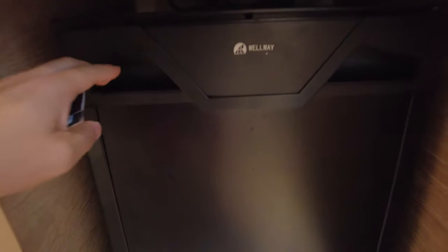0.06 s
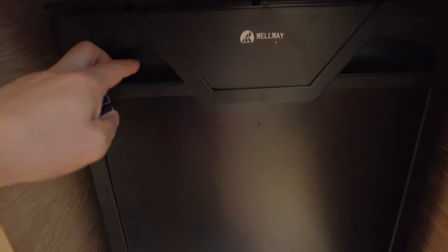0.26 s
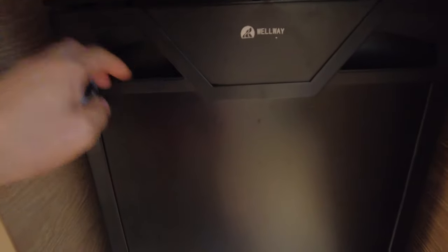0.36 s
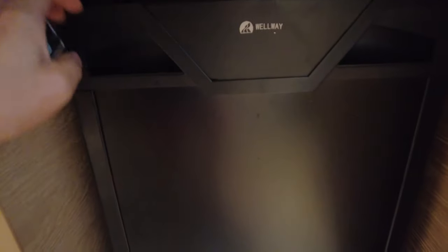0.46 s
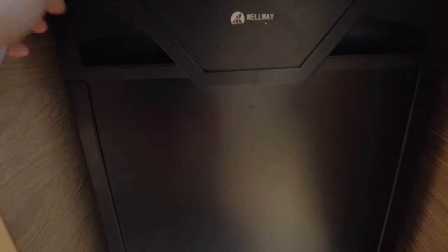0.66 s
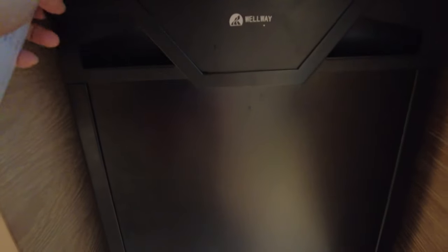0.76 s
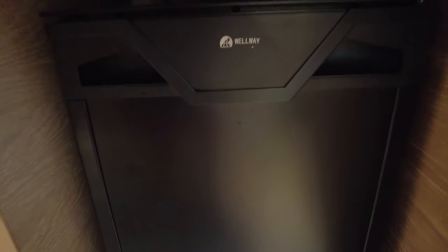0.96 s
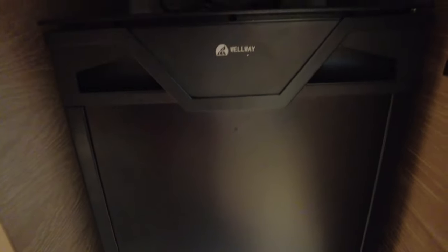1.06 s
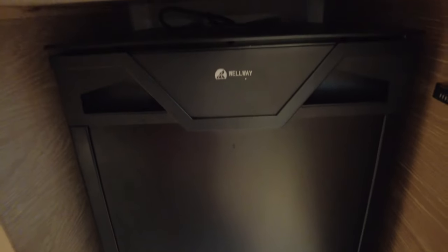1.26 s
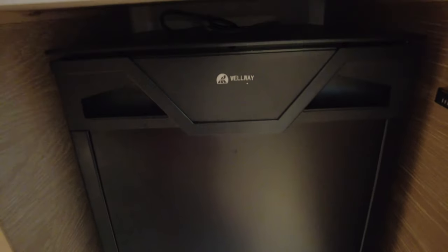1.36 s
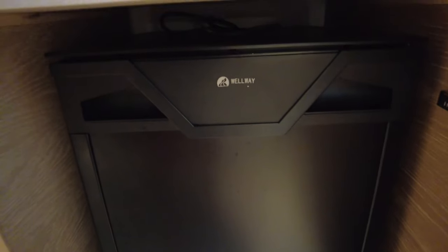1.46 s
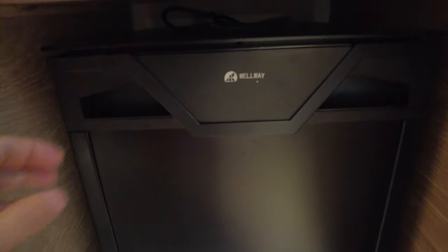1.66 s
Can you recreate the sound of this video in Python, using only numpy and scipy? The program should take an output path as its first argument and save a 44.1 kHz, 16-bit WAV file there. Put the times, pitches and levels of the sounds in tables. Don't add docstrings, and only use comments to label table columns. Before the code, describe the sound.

Sharp plastic clicks and a low knock as a small fridge door grip is handled up close

```python
import sys
import numpy as np
from scipy import signal
from scipy.io import wavfile
from scipy.ndimage import uniform_filter1d, map_coordinates

SR = 44100
rng = np.random.default_rng(int(sys.argv[2]) if len(sys.argv) > 2 else 0)


def decibels_to_gain(level_db):
    exponent = np.asarray(level_db, float) / 20
    return 10 ** exponent


def unload_wav(signal):
    wavfile.write(
        sys.argv[1],
        SR,
        np.round(np.clip(np.atleast_2d(signal).T, -1, 1) * 32767).astype(np.int16),
    )


N = 74970
T = np.arange(N) / SR
OPPOSITE = np.array([[1], [-1]])

# f/Hz, level/dB, t60/s
GRIP_MODES = [(1250, -9, .018), (1615, -4, .02), (2170, -7, .014), (2620, -4, .015), (3400, -7, .012),
              (3900, -8, .012), (4680, -9, .01), (5500, -11, .01), (7400, -13, .008), (8700, -15, .008)]
# f/Hz, level/dB, t60/s
PANEL_MODES = [(194.4, -5.5, 0.23), (236.8, -5.5, 0.14), (295.2, -7, 0.15), (354, -14, 0.12),
               (409.4, -4.5, 0.065), (466, -9, 0.11), (584, -9.5, 0.044), (711, -15.5, 0.012),
               (990, -24, 0.039)]


def unit(x):
    return x / np.sqrt(np.mean(x ** 2))


def even(x, fade):
    return x * np.sqrt(np.sum(fade ** 2) / np.sum(x ** 2, axis=1, keepdims=True))


def band(x, hz, width):
    return signal.lfilter(*signal.iirpeak(min(hz, .45 * SR), max(hz / width, .2), fs=SR), x)


def ring(x, hz, t60):
    pole = np.exp(2j * np.pi * hz / SR - np.log(1000) / (t60 * SR))
    return signal.lfilter([1], [1, -pole], x).imag


def highpass(x, hz):
    return signal.lfilter(*signal.butter(2, hz, "high", fs=SR), x)


def walk(rate):
    hold = int(SR / rate)
    steps = np.repeat(rng.standard_normal(N // hold + 1), hold)
    return 1.3 * uniform_filter1d(uniform_filter1d(steps, hold), hold)[:N]


def add(out, s, x):
    i = int(s * SR)
    out[..., i:i + x.shape[-1]] += x[..., :N - i]


def wide_burst(fade):
    mid, side = rng.standard_normal((2, len(fade)))
    side_db = -2.5
    return even((mid + decibels_to_gain(side_db) * side * OPPOSITE) * fade, fade)


def grip_ring(push, level_db):
    body = 0
    for hz, db, t60 in GRIP_MODES:
        level_luck, pitch_luck = rng.standard_normal(2)
        level = decibels_to_gain(db + level_db + 0.85 * level_luck)
        body = body + level * ring(push, hz * (1 + 0.058 * pitch_luck), t60)
    return body


def clicks():
    # t/s, level/dB, own ring f/Hz, crack/dB re level, grip/dB re level
    click_events = [(0.212, -32, 2460, -25, 0.5), (0.2131, -29.5, 4010, -18, -0.5),
                    (0.2165, -39.5, 2480, -25, -12), (0.2298, -29.5, 1260, -25, -2.5),
                    (0.2305, -42, 4030, -15, -15), (0.2365, -32.5, 2420, -23, -6),
                    (0.2425, -47, 2450, -25, -10), (0.2478, -41, 2180, -25, -21),
                    (0.2545, -38, 1600, -25, -19), (0.3689, -39, 2410, -25, -18),
                    (0.3774, -41, 2840, -12, -7.5), (.3935, -35, 1580, -25, -23),
                    (0.4275, -35.5, 2680, -15, -15), (.5260, -45.5, 1460, -32, -10),
                    (.5325, -36.5, 663, -31, -20), (.5345, -53, 2200, -27, -10),
                    (0.5475, -53.5, 3100, -20, 2.5), (0.586, -28.5, 1630, -38, -23.5),
                    (0.5885, -47.5, 1600, -24, -7), (.594, -48, 2550, -21, -7), (0.598, -36, 974, -27, -17),
                    (.6035, -49, 1430, -25, -15), (.6420, -59, 7700, 9.5, -2), (0.736, -50, 1420, -27, -21),
                    (0.7572, -40.5, 1690, -21, -16), (.8650, -46.5, 1580, -30, -24),
                    (0.8765, -46.5, 5050, -19, -7), (0.8995, -46.5, 1490, -20, -14),
                    (1.3111, -33, 1625, 8, -8), (1.3118, -35, 2440, -6, -4.5), (1.316, -49, 2200, 2, 1),
                    (1.3605, -58, 2290, 13, 9)]
    scrape_s, snap_s, crack_s = 0.0015, 0.0041, 0.00039
    snap_hz, crack_hz = 3800, 12700
    grip_level_db, snap_db = -1.5, 3.5
    out, t = np.zeros((2, N)), T[:6000]
    for s, db, hz, crack_db, grip_db in click_events:
        scrape = rng.standard_normal(len(t)) * np.exp(-t / scrape_s)
        scrape = scrape / np.sqrt(np.sum(scrape ** 2))
        own_t60 = .018 * (1660 / hz) ** .4
        own_ring = ring(scrape, hz, own_t60)
        body = grip_ring(scrape, grip_level_db + grip_db)
        crack = band(wide_burst(np.exp(-t / crack_s)), crack_hz, 18000.0)
        crack = highpass(1.1 * decibels_to_gain(crack_db) * crack, 3000)
        snap = band(wide_burst(np.exp(-t / snap_s)), snap_hz, 6000.0)
        snap = decibels_to_gain(snap_db + grip_db) * band(snap, snap_hz, 6000.0)
        add(out, s, decibels_to_gain(db) * (snap + own_ring + body + crack))
    return highpass(out, 520)


def panel_ring(tap):
    side_db = -12.5
    panel = 0
    for hz, db, t60 in PANEL_MODES:
        level_luck, side_luck = rng.standard_normal(2)
        balance = 1 + decibels_to_gain(side_db) * side_luck * OPPOSITE
        panel = panel + decibels_to_gain(db + 3.52 * level_luck) * balance * ring(tap, hz, t60)
    return panel


def knocks():
    # t/s, cabinet level/dB, cabinet f/Hz, panel level/dB, direction +-1
    knock_events = [(.003, -38, 49, -43, 1), (0.2116, -61, 121, -28, -1), (0.2137, -18, 79.3, -37.5, 1),
                    (0.2228, -62, 75, -30.5, -1), (0.263, -33, 62, -35, 1), (0.281, -32, 66, -39.5, 1),
                    (.335, -39, 94, -41, 1), (0.371, -36.5, 49.4, -41.5, -1), (.392, -29, 87.6, -35.5, 1),
                    (0.4, -60, 129, -39, -1), (.411, -45, 118, -37, -1), (.419, -49, 92.5, -32.5, -1),
                    (0.449, -64, 124, -41.5, -1), (.599, -62, 129, -37.5, 1), (0.606, -67, 129, -38.5, 1),
                    (0.635, -59, 68.5, -45, 1), (0.703, -36, 60.5, -50, -1), (0.764, -43, 93, -42, 1),
                    (0.815, -38.5, 149, -62, 1), (0.869, -38.5, 45, -44.5, 1), (.897, -31.5, 119.4, -38, 1),
                    (.911, -27.5, 60.3, -43, 1), (.621, -61, 134, -40.5, -1), (1.341, -72, 190, -45, 1),
                    (1.358, -44, 184.3, -48, -1)]
    cabinet_t60_s, push_s, tap_s = 0.11, 0.003, 0.0016
    overtone_ratio, overtone_db = 1.987, -3.5
    out, t = np.zeros((2, N)), T[:12000]

    def bump(s):
        return np.sin(np.pi * np.clip(t / s, 0, 1)) ** 2 * 2 / (s * SR)

    push, tap = bump(push_s), bump(tap_s)
    for s, db, hz, panel_db, way in knock_events:
        panel = panel_ring(tap)
        overtone = ring(push, overtone_ratio * hz, cabinet_t60_s / 2)
        boom = ring(push, hz, cabinet_t60_s) + decibels_to_gain(overtone_db) * overtone
        add(out, s, np.sign(way) * (decibels_to_gain(db) * boom + decibels_to_gain(panel_db) * panel))
    return out


def rubs():
    # start t/s, length/s, level/dB, squeak f/Hz, hiss/dB re level
    rub_events = [(-.06, 0.17, -74.5, 1570, 1.5), (0.21, 0.0062, -39.5, 2450, -21),
                  (0.216, 0.014, -47, 900, -18), (0.227, 0.022, -46, 2070, -36),
                  (0.251, 0.017, -51.5, 1470, -30), (0.265, 0.038, -47, 2300, -45),
                  (.3, 0.028, -60.5, 1310, -30), (0.339, 0.023, -57.5, 1010, -4),
                  (0.36, 0.035, -50.5, 2330, -10), (0.391, 0.021, -59.5, 1580, -33),
                  (0.393, 0.028, -55.5, 565, -30), (0.409, 0.015, -53, 2500, -38),
                  (0.519, 0.059, -76.5, 1460, 12), (0.584, 0.016, -60, 2350, -35),
                  (0.589, 0.036, -61, 950, -12), (0.637, 0.022, -63, 1470, -7),
                  (0.706, 0.051, -63.5, 1520, -11), (0.87, 0.018, -63, 1390, -6),
                  (0.9, 0.029, -68.5, 1400, -19), (0.94, 0.011, -79.5, 2020, 11.5),
                  (0.434, 0.047, -65.5, 1990, -20), (.99, 0.028, -86.5, 2500, 13),
                  (1.057, 0.046, -71, 2710, 6.5), (1.123, 0.063, -75.5, 2520, 3),
                  (1.193, 0.1, -73.5, 2560, 6.5), (1.305, 0.026, -54.5, 2420, 6.5),
                  (1.337, 0.031, -60, 2240, 6.5), (1.366, 0.044, -62.5, 1710, -43),
                  (1.369, 0.081, -73, 1610, 5.5)]
    side_db, grain_db, body_db, panel_db = -1.5, 2.0, -2, 1.5
    squeak_width_hz, body_hz = 370, 2200
    edge = .3
    out = np.zeros((2, N))
    roughness_db = grain_db * rng.exponential(size=N) + 1.9 * walk(150)
    mid, side = rng.standard_normal((2, N)) * decibels_to_gain(roughness_db)
    grains = unit(mid + decibels_to_gain(side_db) * side * OPPOSITE)
    grip = sum(decibels_to_gain(db) * ring(grains, hz, t60 / 3) for hz, db, t60 in GRIP_MODES)
    body = unit(band(grip, body_hz, 2800.0))
    panel = unit(sum(decibels_to_gain(db) * ring(grains, hz, t60 / 2) for hz, db, t60 in PANEL_MODES))
    hiss = unit(band(grains, 3200.0, 6000.0))
    for s, length, db, hz, hiss_db in rub_events:
        u = (T - s) / length
        shape = np.clip(np.minimum(u / edge, 1 + (1 - u) / (2 * edge)), 0, 1) ** 2
        squeak = unit(band(grains, hz, squeak_width_hz))
        rub = squeak + decibels_to_gain(body_db) * body + decibels_to_gain(panel_db) * panel + decibels_to_gain(hiss_db) * hiss
        out += shape * decibels_to_gain(db) * rub
    return out


def late_right(near):
    lag_samples, lag_cut_hz = 2.6, 10500
    left, right = near
    low = signal.lfilter(*signal.butter(1, lag_cut_hz, fs=SR), right)
    late = map_coordinates(low, [np.arange(N) - lag_samples], mode="nearest")
    return np.array([left, right - low + late])


def room_tail(near):
    tail_db, tail_t60_s, tail_hz = -16, 0.2, 3240
    t = T[:16000]
    tail = band(rng.standard_normal((2, len(t))), tail_hz / 2, tail_hz)
    tail = tail * decibels_to_gain(-60 * t / tail_t60_s) * np.clip(t / 0.0033, 0, 1)
    tail = decibels_to_gain(tail_db) * tail / np.sqrt(np.sum(tail ** 2) / 2)
    return signal.fftconvolve(near, tail, axes=1)[:, :N]


def hand_tremble():
    # t/s, level/dB
    tremble_curve = [(0, -42), (.2, -55), (.5, -45.5), (.75, -48), (1., -50.5), (1.3, -55), (1.7, -56)]
    tremble_hz, pan_db = 45, -1.16
    shake = band(rng.standard_normal(N), tremble_hz, 47.0)
    shake = unit(band(shake, tremble_hz, 190.0))
    level_db = np.interp(T, *np.array(tremble_curve).T)
    return shake * decibels_to_gain(level_db) * decibels_to_gain(pan_db * OPPOSITE)


def room_tone():
    # f/Hz, level/dB per Hz
    room_curve = np.array([(25, 6.5), (60, -8.5), (130, -9.5), (400, -16.5), (750, -29), (2600, -36.5),
                           (4200, -48), (16000, -56.5)])
    room_db, flicker_db, wide_hz = -51, 1.5, 406
    out = 0
    for hz in 22 * 2 ** (np.arange(29) / 3):
        mid, side = (unit(band(band(rng.standard_normal(N), hz, hz / 3), hz, hz / 3)) for _ in range(2))
        db = np.interp(np.log(hz), np.log(room_curve[:, 0]), room_curve[:, 1])
        db = db + 10 * np.log10(hz) + flicker_db * walk(8.67)
        width = min(hz / wide_hz, 1.1) ** 1.8
        out = out + decibels_to_gain(db) * (mid + width * side * OPPOSITE)
    return unit(out) * decibels_to_gain(room_db)


def scene():
    near = clicks() + knocks() + rubs()
    return late_right(near) + room_tail(near) + room_tone() + hand_tremble()


def top_cut(x):
    return signal.sosfilt(signal.butter(12, 17140, fs=SR, output="sos"), x)


def record(dry):
    top_hz = 16300
    cut = signal.sosfilt(signal.ellip(8, .2, 40, top_hz, fs=SR, output="sos"), dry)
    return top_cut(cut)


dry = scene()
out = record(dry)
unload_wav(out)
```